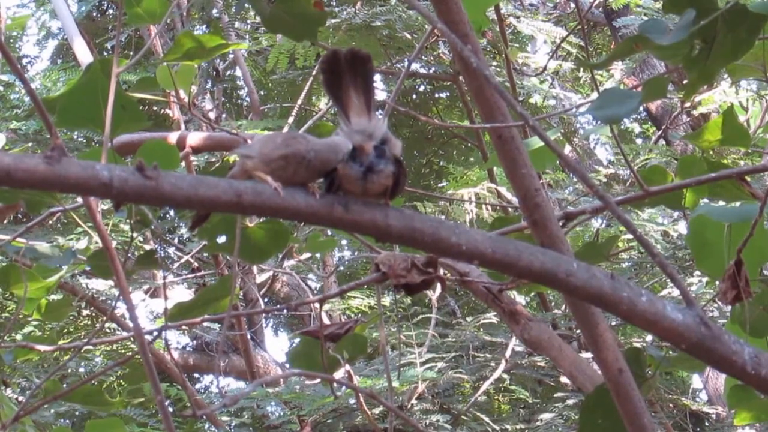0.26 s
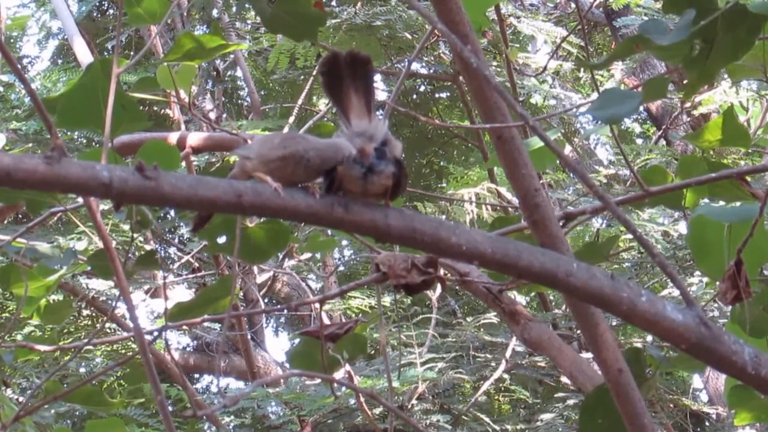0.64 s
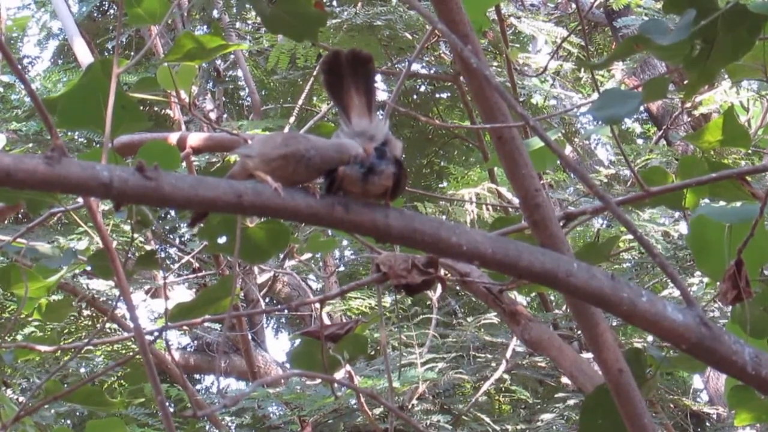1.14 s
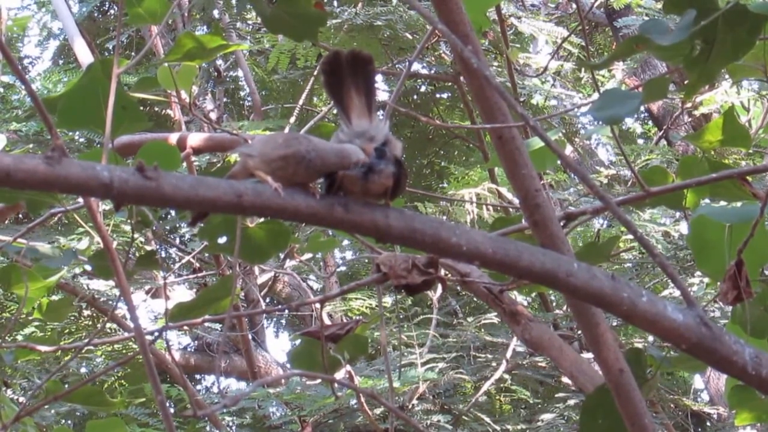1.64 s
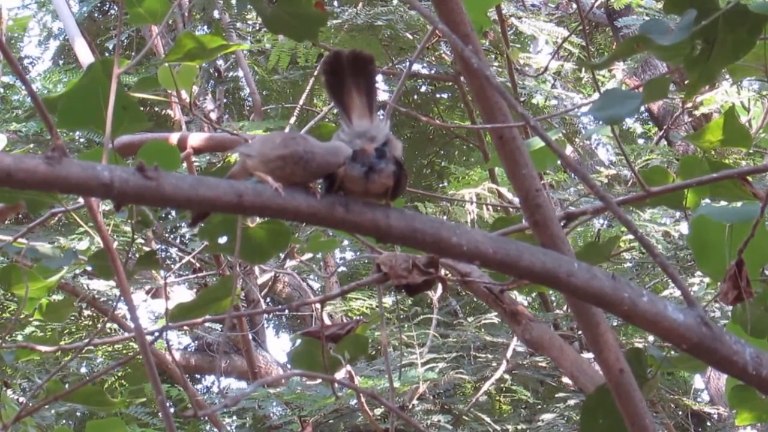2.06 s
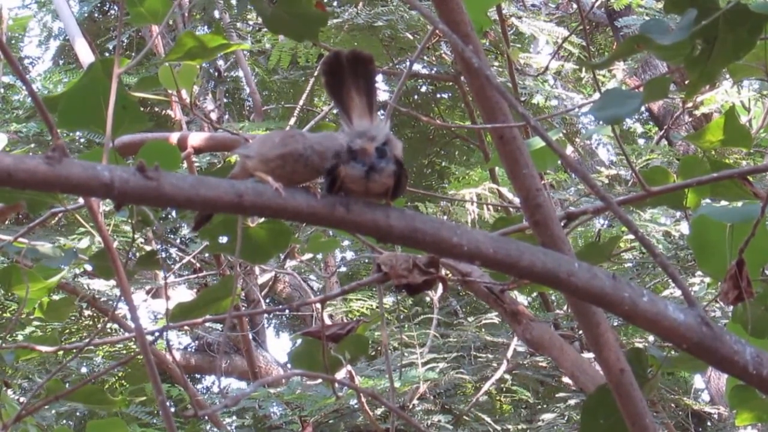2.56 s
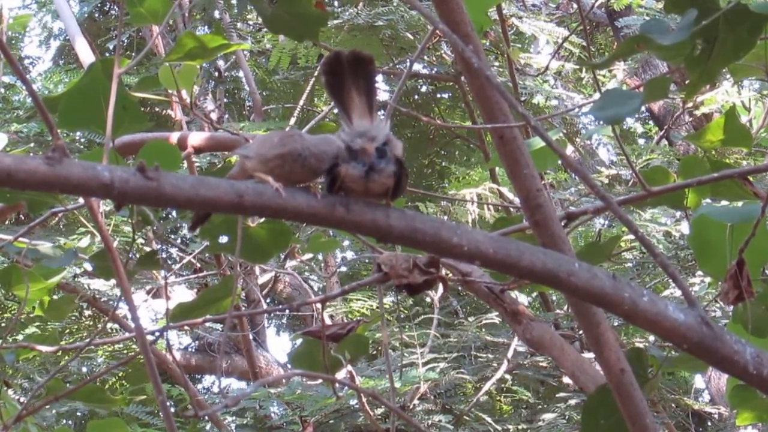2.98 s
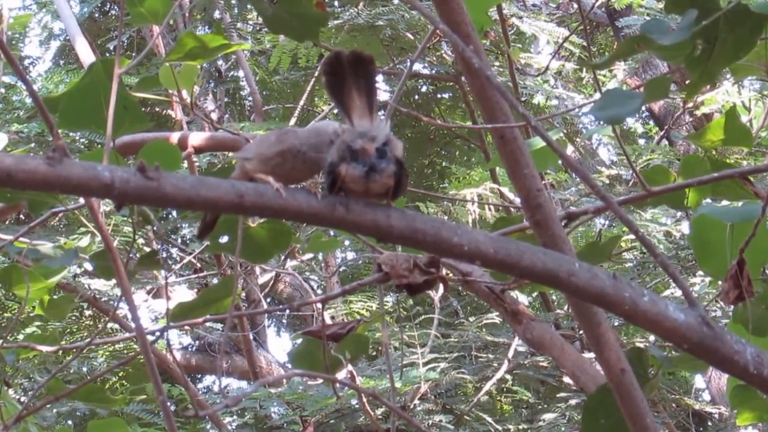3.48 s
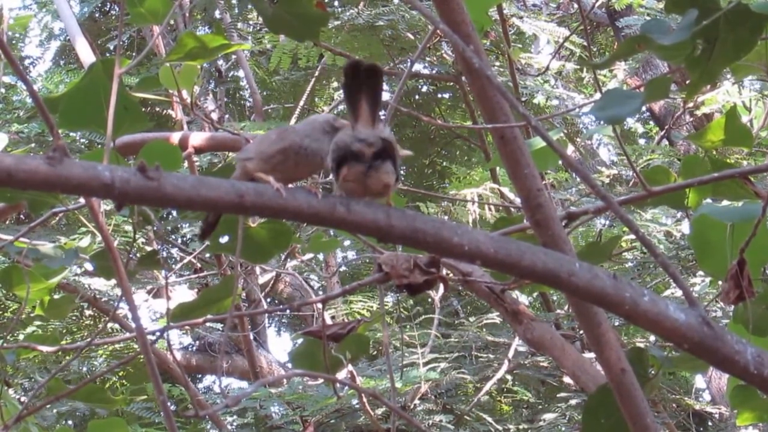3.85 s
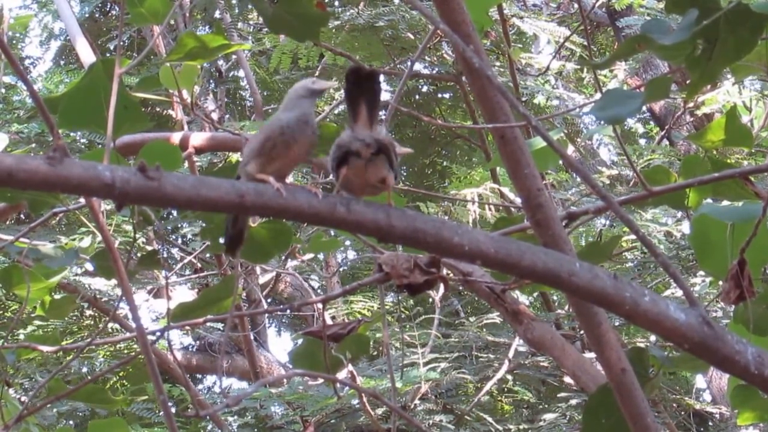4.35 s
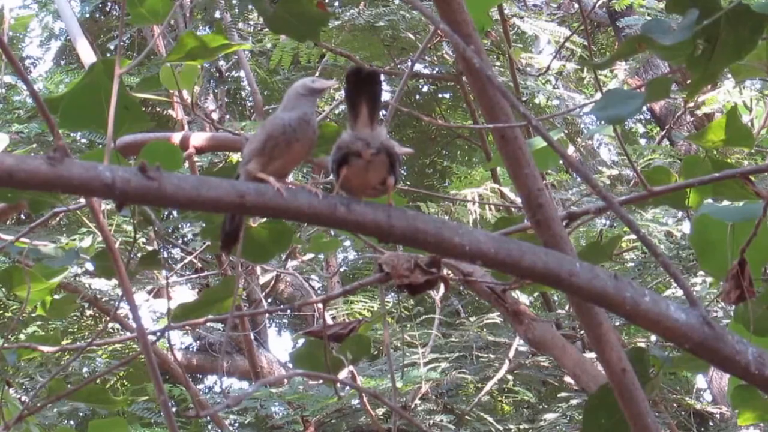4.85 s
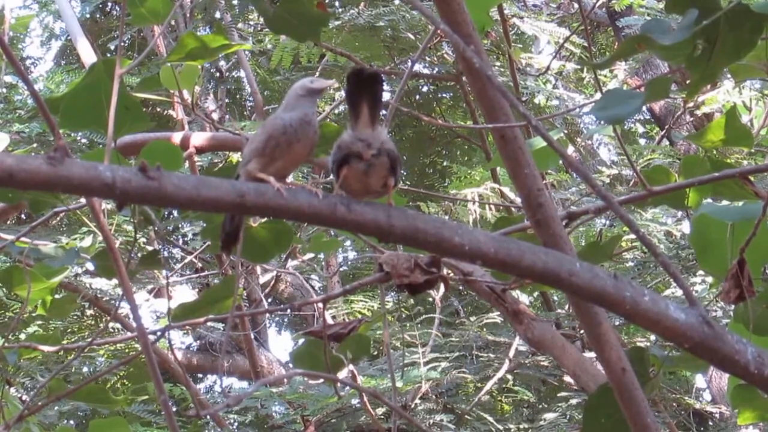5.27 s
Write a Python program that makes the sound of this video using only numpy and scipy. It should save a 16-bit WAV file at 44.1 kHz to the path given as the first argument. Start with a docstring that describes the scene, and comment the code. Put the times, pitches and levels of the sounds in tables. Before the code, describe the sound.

Outdoor birdsong with thin whistles, trills and rasping distant caws, steady hiss breaking into soft swells, then a sharp close squeak and peeps.

```python
"""A bright hiss holds steady over the rumble and hum of a distant town, then returns in soft swells.
Small birds in the grove whistle, twitter and trill as sliding, trembling sines; a crow caws further off
as a wobbling tone through two throat resonances. A babbler close by on a branch gives quick upward
flicks, a loud squeak and soft peeps; a nasal and a reedy call, made of overtones, come last.
Sparse echoes from trunks and leaves surround every bird; the recorder adds a faint, very high whine."""
import sys
import numpy as np
from scipy import signal
from scipy.fft import rfft, irfft
from scipy.io import wavfile
from scipy.ndimage import uniform_filter1d

SR = 44100
rng = np.random.default_rng(int(sys.argv[2]) if len(sys.argv) > 2 else 0)


def dump_mix(stems):
    """Bounce the given channels to the path in sys.argv[1] as a 16-bit WAV at rate SR."""
    frames = np.atleast_2d(stems).T  # one column per channel
    limited = np.clip(frames, -1, 1)  # hard clip at full scale
    pcm = np.round(limited * 32767).astype(np.int16)
    wavfile.write(sys.argv[1], SR, pcm)


N = 242991
TIME = np.arange(N) / SR   # s

# Bird levels are those of the dry calls, before echoes and placing.
# Spectra of noise: f/Hz, relative density/dB
HISS_SPECTRUM = [(1200, -15), (2500, -13.5), (3500, -7), (3780, -8.5), (5480, -2), (9850, -0.5),
                 (10900, -3.5), (11800, -3.5), (15800, -17)]
RUMBLE_SPECTRUM = [(15, -44), (25, -31), (48, -2.5), (97, -3), (127, -2.5), (148, -3.5), (221, -0.5),
                   (277, -7.5), (362, -7), (492, -12.5), (668, -14), (1060, -20.5), (1730, -24.5),
                   (2020, -30), (2400, -34.5), (3120, -59), (5280, -120)]
LOW_SWELL_SPECTRUM = [(130, -7), (185, 4.5), (230, -1.5), (300, -10), (600, -30.5)]
AIR_SPECTRUM = [(1180, -47), (2000, -7), (2830, -4.5), (3510, -6.5), (4580, -6.5), (5100, -10.5),
                (14500, -16.5)]
# How alike the two channels of the background are: f/Hz, correlation
CHANNEL_LIKENESS = [(60, .999), (150, 1), (350, 0.906), (700, 0.52), (1500, 0.78), (4000, 0.93),
                    (12000, 0.3)]
# Swells of the hiss, and of the low rumble: peak t/s, level/dB, rise/(dB/s), fall/(dB/s)
HISS_SWELL_PEAKS = [(2.78, -53, 110, 58), (3.25, -52.5, 135, 41), (3.98, -52, 81, 40), (4.69, -56, 33, 48),
                    (5.29, -53, 86, 54)]
RUMBLE_SWELL_PEAKS = [(4.09, -34, 160, 110), (4.5, -40.5, 21, 8)]
# Three-note phrase: t after its start/s, length/s, f/Hz, slide/octaves, level re phrase/dB, roughness 0-1
PHRASE_NOTES = [(0, 0.029, 2880, -.1, -4, .35), (.126, 0.029, 2810, 0.046, 0, .08),
                (0.164, .016, 2016, -0.13, 0.5, .15)]
# Where the phrase is sung: t/s, level/dB
PHRASE_ENTRIES = [(.016, -36.5), (5.135, -39)]
# Thin sliding whistles in the trees: t/s, length/s, f/Hz, slide/octaves, level/dB, roughness 0-1
SLIDING_NOTES = [(.44, 0.032, 2277, -.09, -43, 0.27), (.97, 0.29, 4930, -0.38, -45.5, 0.36),
                 (1.45, .17, 4650, -0.2, -48, 0.22), (1.92, .19, 4105, -0.029, -47.5, 0.07),
                 (3.262, .022, 3160, 0.077, -42.5, .12), (3.42, .058, 3180, -.22, -51.5, .44),
                 (3.58, .24, 3700, -.58, -52.5, 0.66), (4.307, 0.048, 4910, 0.079, -48.5, .55),
                 (4.36, .116, 5780, .05, -58, 0.55), (5.02, .11, 4254, 0, -55, 0.34),
                 (5.06, .076, 5800, 0.37, -62, .3)]
# Warbling trills: t/s, length/s, centre f/Hz, swings/Hz, level at mid-swing/dB
TRILL_RUNS = [(0.584, 0.46, 3068, 14, -51), (2.485, 0.396, 3030, 14, -52)]
# Arched, slightly hoarse chirps: t/s, length/s, top f/Hz, drop at the ends/octaves, level/dB
ARCHED_CHIRPS = [(3.296, 0.1, 4210, 0.42, -45), (4.812, .115, 4830, 0.18, -50),
                 (4.923, 0.056, 4560, .12, -56)]
# Runs of short rough notes: t/s, length/s, central f/Hz, level/dB
SHORT_NOTE_RUNS = [(1.98, .29, 3480, -51), (2.55, .41, 3310, -58.5), (3.85, .28, 3390, -56),
                   (4.13, .19, 3356, -48), (4.35, .18, 3480, -55.5), (4.33, .14, 2310, -53)]
# Far twittering, and last a rough patch of the crow's overtone in its long caw: columns as above
TWITTER_RUNS = SHORT_NOTE_RUNS[:-1]
CAW_OVERTONE_PATCH = SHORT_NOTE_RUNS[-1:]
# Crow caws: t/s, length/s, attack/s, release/s, level/dB, lower resonance re upper/dB,
# upper resonance at mid-caw f/Hz, rasp rate at mid-caw f/Hz
CROW_CAWS = [(1.279, .41, 0.092, 0.045, -34, -1, 1495, 117),
             (1.886, .41, 0.17, 0.049, -33, -.5, 1520, 122.4),
             (2.479, .38, 0.14, 0.17, -34.5, -3, 1560, 120.5),
             (4.021, .65, 0.33, 0.22, -35.5, 2, 1625, 121.6),
             (4.93, .26, .13, 0.14, -40.5, -10, 1543, 125.8)]
# Quick upward flicks, and soft peeps, from the branch: t/s, length/s, f/Hz, slide/octaves, level/dB
FLICK_NOTES = [(3.517, 0.031, 6650, 0.383, -39.5), (3.512, .028, 5700, 0.97, -43),
               (3.532, 0.017, 4500, 0.57, -41.5)]
PEEP_NOTES = [(4.598, 0.045, 4360, 0.018, -45.5), (4.657, .024, 4240, -0.029, -43),
              (4.71, 0.017, 4190, -.045, -43), (4.735, .053, 3880, -.07, -57)]
# Loud squeak close by: t/s, f/Hz, level/dB; its partials: multiple of f, level/dB
SQUEAK_CURVE = [(3.957, 3910, -22), (3.967, 4260, -18.5), (3.975, 4466, -29), (3.982, 4483, -15.5),
                (3.995, 4559, -18.5), (4.003, 4500, -19.5), (4.011, 4154, -25), (4.02, 3740, -30.5),
                (4.034, 3404, -46)]
SQUEAK_PARTIALS = [(1, 0.5), (1.5, -22), (2, -8), (3, -19)]
# Thin reedy call: t/s, f/Hz, level/dB; its partials: multiple of f, level/dB
REEDY_CURVE = [(5.13, 684, -67), (5.2, 690, -59), (5.3, 701, -55.5), (5.36, 712, -65), (5.44, 699, -70)]
REEDY_PARTIALS = [(4, 7), (5, -0.5), (6, -2), (8, -2), (9, -3), (10, 3.5), (12, -11)]
# Nasal call: t/s, f/Hz, level/dB; its partials: multiple of f, level/dB
NASAL_CURVE = [(5.29, 502, -56), (5.315, 485, -46), (5.4, 490.5, -45), (5.51, 468, -45)]
NASAL_PARTIALS = [(2, -10), (3, -1.5), (4, 2), (5, -15)]

HISS_DB, HISS_STOPS_S, HISS_RELEASE_DB_PER_S = -40, 2.42, 71   # steady hiss, then its dying away
SWELL_ROUNDING_S = .025   # how blunt the top of a swell is
RUMBLE_DB, AIR_DB = -38.5, -61.0
HUM_HZ, HUM_DB = 124.8, -47.5   # centres of the wavering hum
SHORT_NOTE_S = .045   # approximate: each run holds a whole number of notes
RUN_SPREAD, RUN_SLIDE = .0245, .091   # scatter of pitch and of slide in a run, octaves
CAW_ONSET_DB, CAW_END_DB, CAW_EASE = 14.5, 12.5, 1.5   # depths and curve of attack and release
BILL_ARCH, RASP_ARCH = .13, .17   # share by which resonances and rasp rate sit lower at both ends
LOWER_FADE_DB = 15.5   # the lower resonance fades by this through the caw
LOWER_THROAT_RATIO, LOWER_WIDTH_HZ, UPPER_WIDTH_HZ = .764, 200, 231
SQUEAK_PAN_DB, OVERTONE_PAN_DB = -1, .5   # the bill beams the overtones to the other side
WHINE_HZ, WHINE_DB, CUTOFF_HZ = 15734, -73, 15900


def from_db(db):
    """Decibels to gain."""
    return 10 ** (np.asarray(db) / 20)


def rms_one(x):
    """Scale to unit power."""
    return x / np.sqrt(np.mean(x ** 2) + 1e-20)


def in_time(rows):
    """Each column of a curve, interpolated sample by sample."""
    s, *columns = np.transpose(rows)
    return [np.interp(TIME, s, column) for column in columns]


def during(start, end, fade=.016):
    """One between two times, with short linear fades inside them; times and fade in s."""
    return np.clip(np.minimum(TIME - start, end - TIME) / fade, 0, 1)


def at_hz(points, hz):
    """Read a spectrum on a log-frequency axis."""
    f, value = np.transpose(points)
    return np.interp(np.log(hz + 1), np.log(f), value)


def drift(rate_hz):
    """Smooth random wander of spread 1: noise through two equal low-pass poles at rate_hz."""
    # made at an eighth of the sample rate; the first samples let the filter settle
    r = np.exp(-16 * np.pi * rate_hz / SR)
    white = rng.standard_normal(N // 8 + 4002)
    slow = rms_one(signal.lfilter([1], [1, -2 * r, r * r], white)[4000:])
    return np.interp(np.arange(N) / 8, np.arange(len(slow)), slow)


def turn(hz):
    """Running phase of a pitch curve."""
    return 2 * np.pi * np.cumsum(hz) / SR


def noise(spectrum, likeness):
    """Stereo noise of a given colour and left-right likeness, falling away past its ends."""
    hz = np.arange(N // 2 + 1) * SR / N
    alike = np.clip(at_hz(likeness, hz), 0, 1)
    low_end = np.minimum(hz / spectrum[0][0], 1) ** 2
    high_end = (1 + (hz / spectrum[-1][0]) ** 12) ** -.5
    mid, side = rfft(rng.standard_normal((2, N)))
    pair = np.sqrt(1 + alike) * mid + np.sqrt(1 - alike) * side * [[1], [-1]]
    colour = low_end * high_end * from_db(at_hz(spectrum, hz))
    return rms_one(irfft(pair * colour, N))


def swells(rows):
    """Gain of overlapping swells: each rises and falls evenly in dB around a rounded top."""
    power = 0
    for s, level_db, rise, fall in rows:
        away = np.hypot(TIME - s, SWELL_ROUNDING_S) - SWELL_ROUNDING_S
        power = power + from_db(level_db - away * np.where(TIME < s, rise, fall)) ** 2
    return np.sqrt(power)


def place(x, pan_db, lag):
    """Direction: the left channel is louder by pan_db and later by lag samples."""
    left, right = np.broadcast_to(x, (2, N))
    delay = np.exp(-2j * np.pi * np.arange(N // 2 + 1) * lag / N)
    late = irfft(rfft(left) * delay, N)
    return np.array([late * from_db(pan_db / 2), right * from_db(-pan_db / 2)])


def grove(x, wet_db, t60, width):
    """Direct sound plus sparse echoes off leaves and trunks: an early burst and a tail of t60 seconds."""
    t = TIME[:SR]
    echoes = rng.standard_normal((2, SR)) * (rng.random((2, SR)) < .05) * (t > .004)
    mid, side = echoes * (from_db(-60 * t / t60) + 1.24 * np.exp(-t / .014))
    tail = rms_one(mid + width * side * np.array([[1], [-1]])) / np.sqrt(SR)
    wet = from_db(wet_db)
    scattered = signal.fftconvolve(x[None], tail, axes=1)[:, :N]
    return (x + wet * scattered) / np.sqrt(1 + wet ** 2)


def voice(rows, overtones, jitter, jitter_hz):
    """A syrinx tone as a sum of partials, all following one trembling pitch."""
    hz, level_db = in_time(rows)
    phase = turn(hz * (1 + jitter * drift(jitter_hz)))
    tone = sum(from_db(db) * np.sin(k * phase) for k, db in overtones)
    return during(rows[0][0], rows[-1][0]) * from_db(level_db) * tone


def whistles(notes, arch, rough, jitter=.0657, octave_db=-27):
    """Each note slides through its pitch, `arch` octaves lower at both ends; rough notes tremble."""
    out, tremble, flutter = np.zeros(N), jitter * drift(450), drift(70)
    arches, roughness = np.broadcast_to(arch, len(notes)), np.broadcast_to(rough, len(notes))
    for (s, length, hz, slide, level_db), drop, shake in zip(notes, arches, roughness):
        at = np.flatnonzero((TIME >= s) & (TIME < s + length))
        u = (TIME[at] - s) / length   # 0 to 1 through the note
        octaves = slide * (u - .5) - drop * (2 * u - 1) ** 2
        phase = turn(hz * 2 ** octaves * (1 + shake * tremble[at]))
        rounded = np.abs(np.sin(np.pi * u)) ** .24
        envelope = from_db(level_db + 4 * shake * flutter[at]) * rounded
        out[at] += envelope * (np.sin(phase) + from_db(octave_db) * np.sin(2 * phase))
    return out


def short_notes(runs):
    """Runs of short rough notes, each with a chance pitch and slide."""
    notes = []
    for s, length, hz, level_db in runs:
        count = max(1, round(length / SHORT_NOTE_S))
        note_s = length / count
        for k, (up, slide) in enumerate(rng.standard_normal((32, 2))[:count]):
            pitch = hz * 2 ** (RUN_SPREAD * up)
            notes.append((s + k * note_s, note_s, pitch, RUN_SLIDE * slide, level_db))
    return whistles(notes, arch=0, rough=.56)


def hiss():
    """Smooth bright noise, a shade to the left: it holds, dies away and returns in soft swells."""
    steady = from_db(HISS_DB - HISS_RELEASE_DB_PER_S * np.maximum(TIME - HISS_STOPS_S, 0))
    gain = np.hypot(steady, swells(HISS_SWELL_PEAKS))
    sound = noise(HISS_SPECTRUM, [(3000, 1.0), (12000, .8)])
    return place(gain * sound, pan_db=.3, lag=-1.27)


def town():
    """Far traffic rumble that swells low down, a hum wavering in pitch and level, and faint high air."""
    rumble = from_db(RUMBLE_DB) * noise(RUMBLE_SPECTRUM, CHANNEL_LIKENESS)
    low_swells = swells(RUMBLE_SWELL_PEAKS) * noise(LOW_SWELL_SPECTRUM, CHANNEL_LIKENESS)
    hum_gain = from_db(HUM_DB + 2 * drift(1.8)) * np.sqrt(2)   # root 2: the level is an rms one
    hum = hum_gain * np.sin(turn(HUM_HZ + 1.53 * drift(4.3)))
    air = from_db(AIR_DB) * noise(AIR_SPECTRUM, CHANNEL_LIKENESS)
    return rumble + low_swells + hum + air


def phrases():
    """A clear three-note whistled phrase, sung twice."""
    notes, rough = [], []
    for start, start_db in PHRASE_ENTRIES:
        for s, length, hz, slide, db, shake in PHRASE_NOTES:
            notes.append((start + s, length, hz, slide, start_db + db))
            rough.append(shake)
    return whistles(notes, arch=0, rough=rough)


def sliding_whistles():
    """Thin whistles whose pitch slides evenly in octaves."""
    notes = np.array(SLIDING_NOTES)
    return whistles(notes[:, :-1], arch=0, rough=notes[:, -1])


def trills(sweep=.0423, jitter=.0249, wander=.018):
    """The pitch swings up and down, loudest at the bottom of each swing."""
    out = np.zeros(N)
    for s, length, hz, per_s, level_db in TRILL_RUNS:
        swing = np.cos(2 * np.pi * per_s * (TIME - s))
        bend = sweep * swing + jitter * drift(260) + wander * drift(5.88)
        tone = np.sin(turn(hz * (1 + bend)))
        out += from_db(level_db) * during(s, s + length, fade=.017) * (1 - .62 * swing) * tone
    return out


def resonate(x, centre_hz, width_hz):
    """A band-pass whose centre may glide; its running power is evened to one over 25 ms."""
    carrier = np.exp(1j * turn(centre_hz * np.ones(N)))
    low_pass = signal.butter(2, width_hz / 2, fs=SR, output="sos")
    # shift the band to zero, smooth it, shift it back
    tone = (signal.sosfilt(low_pass, x / carrier) * carrier).real
    return tone / np.sqrt(np.abs(uniform_filter1d(tone ** 2, size=1100)) + 1e-12)


def caw_controls():
    """Each caw swells and dies; rasp and resonances arch with the bill, the lower resonance fades."""
    u, points = np.linspace(0, 1, 40), []
    closed = (2 * u - 1) ** 2
    for s, length, attack, release, level_db, lower_db, hz, pulse_hz in CROW_CAWS:
        opening = np.maximum(1 - u * length / attack, 0) ** CAW_EASE
        closing = np.maximum(1 - (1 - u) * length / release, 0) ** CAW_EASE
        upper_db = level_db - CAW_ONSET_DB * opening - CAW_END_DB * closing
        fading_db = upper_db + lower_db - LOWER_FADE_DB * u ** 2
        upper_hz, rasp_hz = hz * (1 - BILL_ARCH * closed), pulse_hz * (1 - RASP_ARCH * closed)
        points += zip(s + u * length, fading_db, upper_db, upper_hz, rasp_hz)
    return in_time(points)


def crow(rasp=.3, overtone_db=-24, jitter=.02, wobble=.95):
    """Hoarse caws: a tone wobbling once every four cycles, through throat resonances led by the bill."""
    lower_db, upper_db, upper_hz, pulse_hz = caw_controls()
    beat = turn(pulse_hz * (1 + jitter * drift(69.1)))
    # the wobble splits each harmonic into closely stacked lines
    phase = 4 * beat + wobble * np.sin(beat) + .3 * drift(250)
    source = sum(np.cos(k * phase) for k in range(1, 8)) * (1 + rasp * drift(200))
    lower = from_db(lower_db) * resonate(source, LOWER_THROAT_RATIO * upper_hz, LOWER_WIDTH_HZ)
    overtone = from_db(overtone_db) * resonate(source, 2.4 * upper_hz, 1350)
    upper = from_db(upper_db) * (resonate(source, upper_hz, UPPER_WIDTH_HZ) + overtone)
    gate = sum(during(s, s + length, fade=.0094) for s, length, *_ in CROW_CAWS)
    return (lower + upper) * gate


def twitters():
    """Far twittering as runs of short notes."""
    return short_notes(TWITTER_RUNS)


def arched_chirps():
    """Hoarse chirps whose pitch rises to a top and falls back."""
    notes = [(s, length, hz, 0, db) for s, length, hz, drop, db in ARCHED_CHIRPS]
    return whistles(notes, arch=[row[3] for row in ARCHED_CHIRPS], rough=.43)


def small_birds():
    """All the whistled song in the trees, as dry sound."""
    return phrases() + sliding_whistles() + trills() + twitters() + arched_chirps()


def flicks():
    """Quick upward slides, made breathy by noise on their level."""
    tone = whistles(FLICK_NOTES, arch=.06, rough=.6, jitter=.088, octave_db=-22)
    return tone * (1 + .32 * rng.standard_normal(N))


def squeak():
    """A loud syrinx tone with overtones, roughened by air rushing through."""
    air = 1 + .056 * drift(2200)
    return voice(SQUEAK_CURVE, SQUEAK_PARTIALS, jitter=.011, jitter_hz=710) * air


def caw_overtone():
    """A rough patch of the crow's overtone around 2.3 kHz during its long caw, as short trembling notes."""
    return short_notes(CAW_OVERTONE_PATCH)


def peeps():
    """Short soft whistles with a marked octave."""
    return whistles(PEEP_NOTES, arch=.024, rough=.12, jitter=.05, octave_db=-12)


def split_at(x, hz):
    """The parts of a sound below and above one frequency."""
    return [signal.sosfilt(signal.butter(6, hz, kind, fs=SR, output="sos"), x) for kind in ("low", "high")]


def babblers():
    """Close calls from the branch; the squeak's overtones scatter more widely than its tone."""
    low, high = split_at(squeak(), 6500)
    tone = grove(low, wet_db=-4, t60=.55, width=.3)
    overtones = grove(high, wet_db=-1, t60=.45, width=.6)
    soft = grove(flicks() + peeps(), wet_db=-7, t60=.5, width=.5)
    squeak_placed = place(tone, SQUEAK_PAN_DB, lag=0) + place(overtones, OVERTONE_PAN_DB, lag=0)
    return squeak_placed + place(soft, pan_db=.5, lag=0)


def reedy_call():
    """A thin call carried by its fourth and higher harmonics alone."""
    return voice(REEDY_CURVE, REEDY_PARTIALS, jitter=.00897, jitter_hz=149)


def nasal_call():
    """A call without its fundamental, strongest in the third and fourth harmonics."""
    return voice(NASAL_CURVE, NASAL_PARTIALS, jitter=.046, jitter_hz=246)


def scene():
    """Hiss and town behind, birds in the trees, the crow to the left and the near babblers."""
    background = hiss() + town()
    # the crow's overtone patch shares the echoes and direction of the trees
    among_trees = small_birds() + caw_overtone() + reedy_call() + nasal_call()
    trees = grove(among_trees, wet_db=0, t60=.9, width=.17)
    caws = grove(crow(), wet_db=-1, t60=.55, width=.42)
    far_birds = place(trees, pan_db=-.3, lag=0) + place(caws, pan_db=2.0, lag=-.62)
    return background + far_birds + babblers()


def record(dry):
    """The recorder adds a faint electronic whine; the top is cut steeply."""
    whine = from_db(WHINE_DB) * np.sin(2 * np.pi * WHINE_HZ * TIME)
    steep_cut = signal.ellip(10, .1, 90, CUTOFF_HZ, fs=SR, output="sos")
    return signal.sosfilt(steep_cut, dry + whine)


dry = scene()
out = record(dry)
dump_mix(out)
```